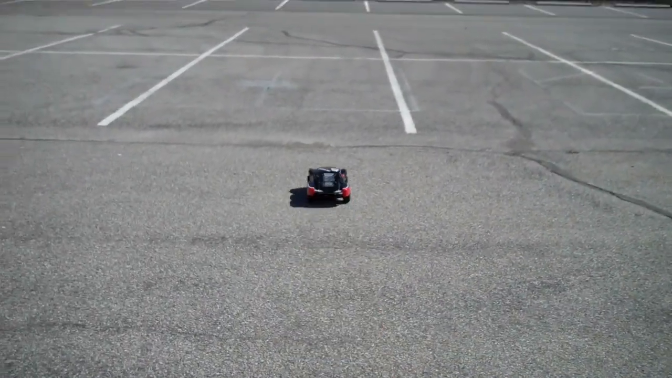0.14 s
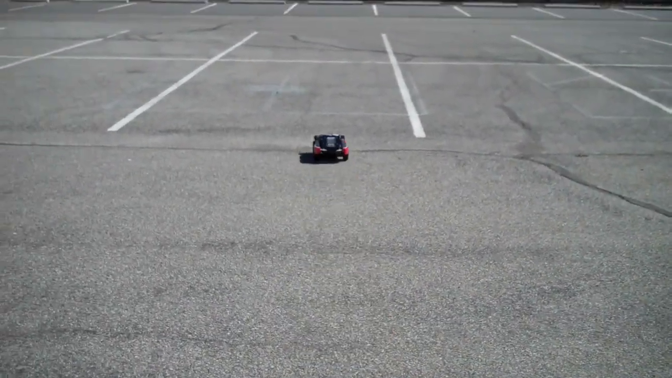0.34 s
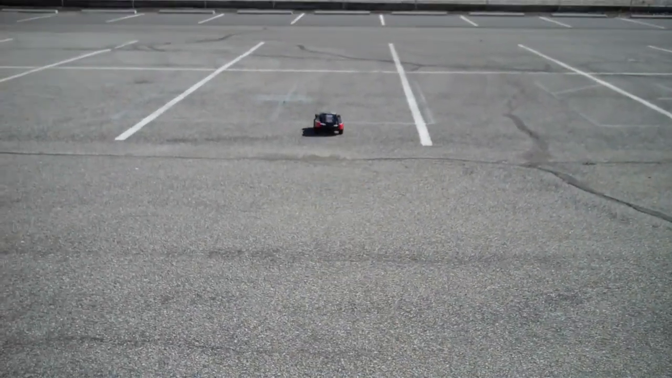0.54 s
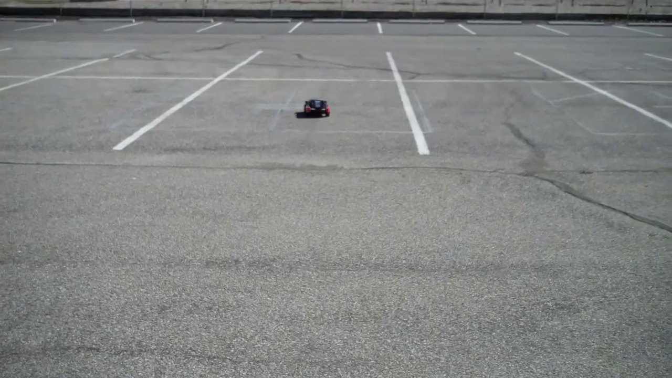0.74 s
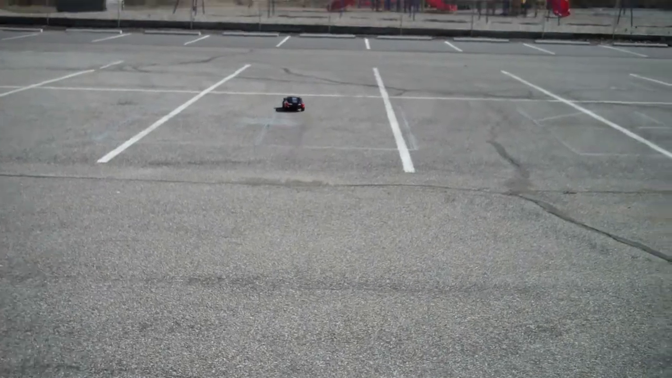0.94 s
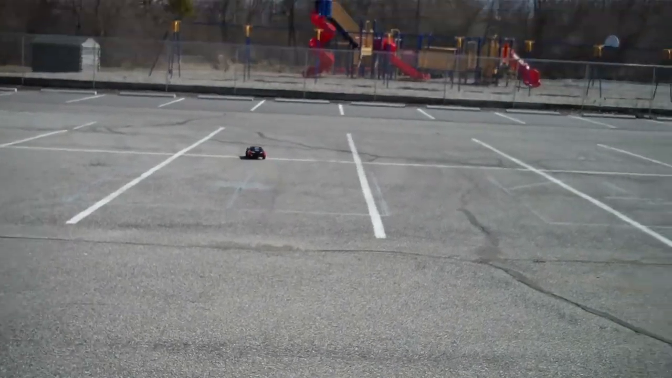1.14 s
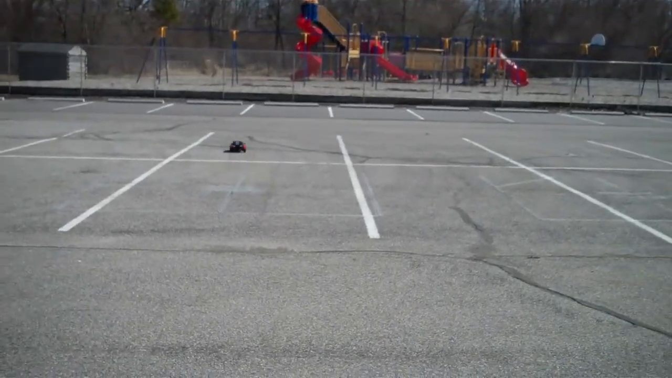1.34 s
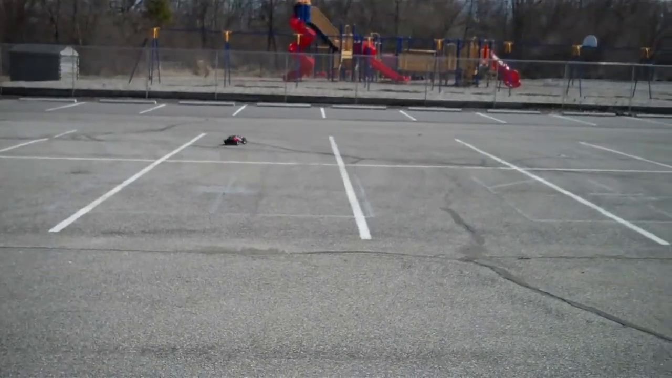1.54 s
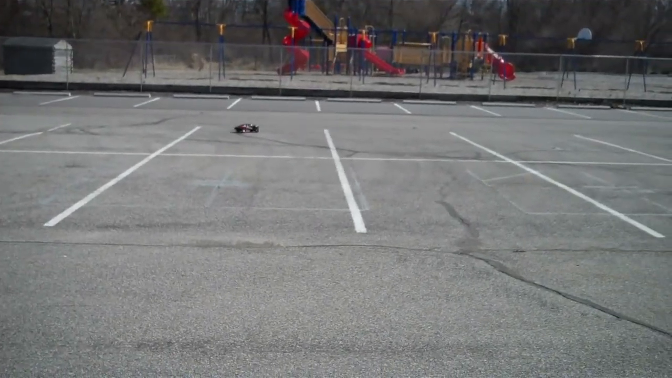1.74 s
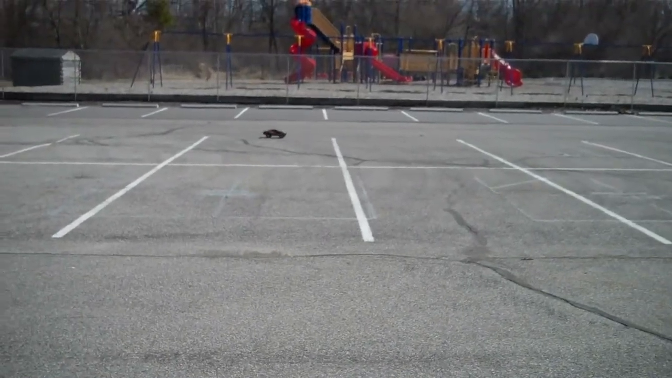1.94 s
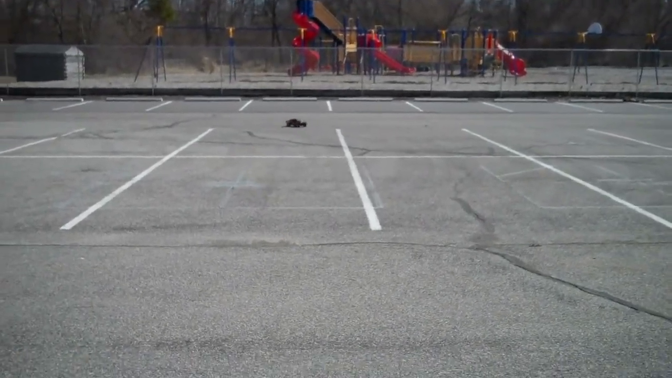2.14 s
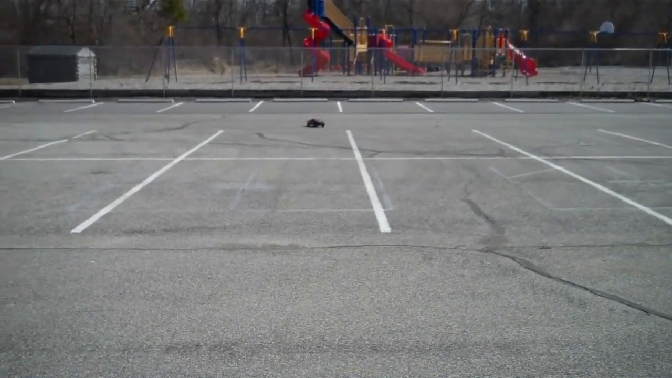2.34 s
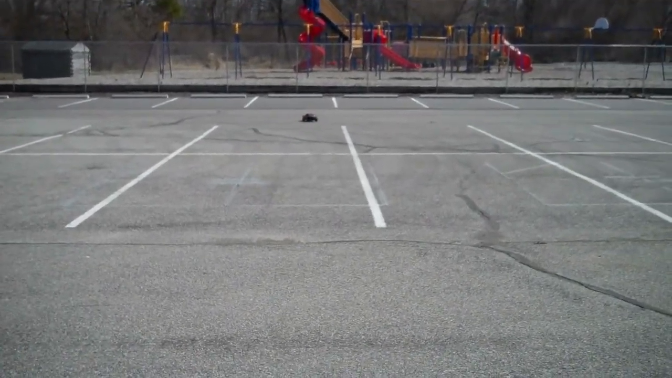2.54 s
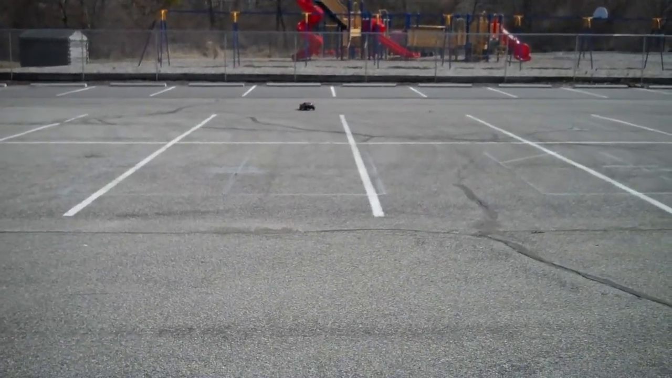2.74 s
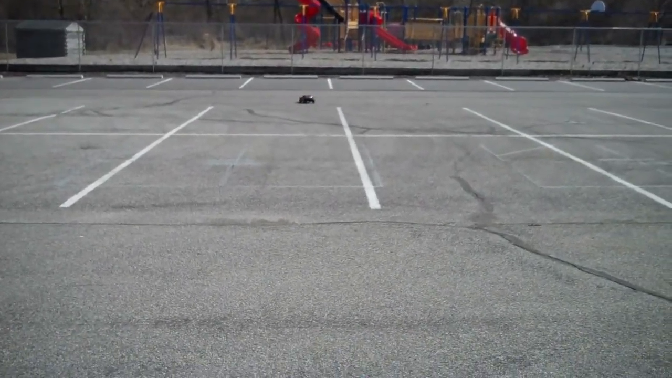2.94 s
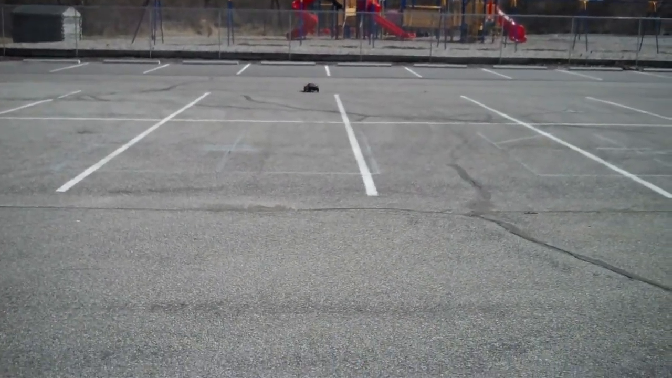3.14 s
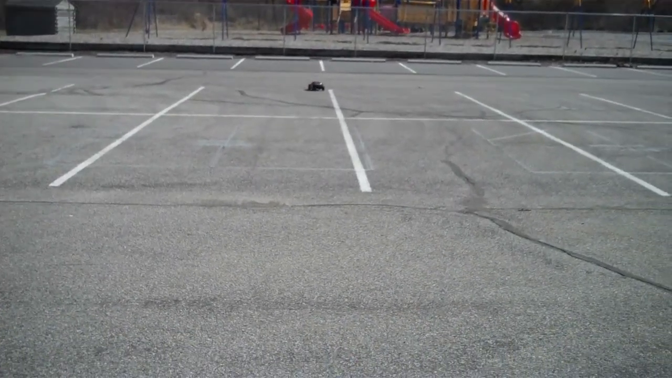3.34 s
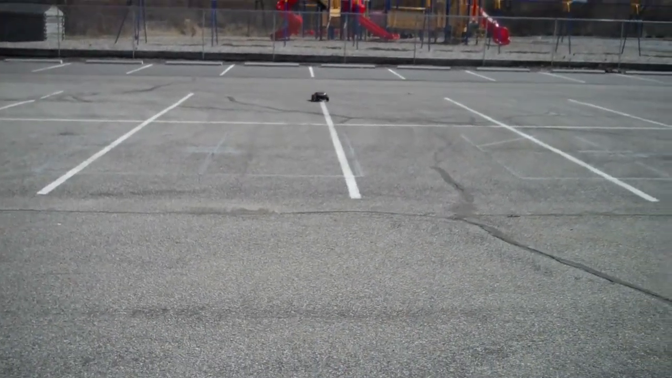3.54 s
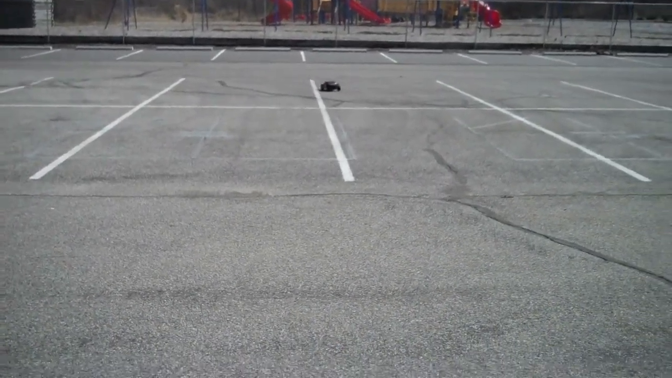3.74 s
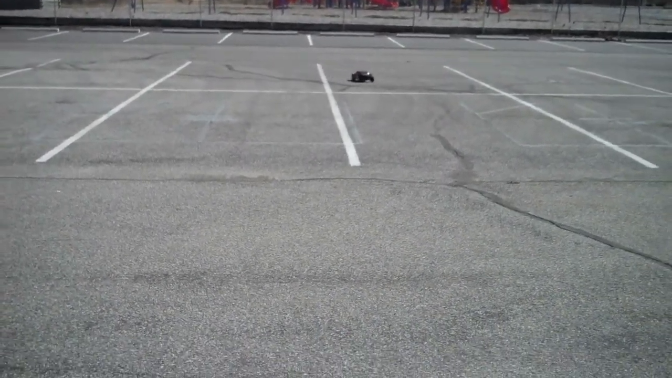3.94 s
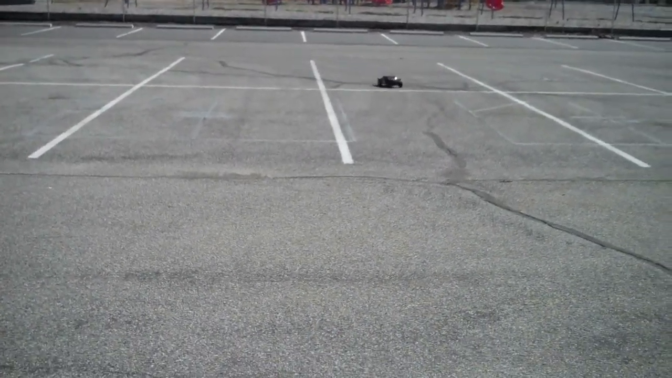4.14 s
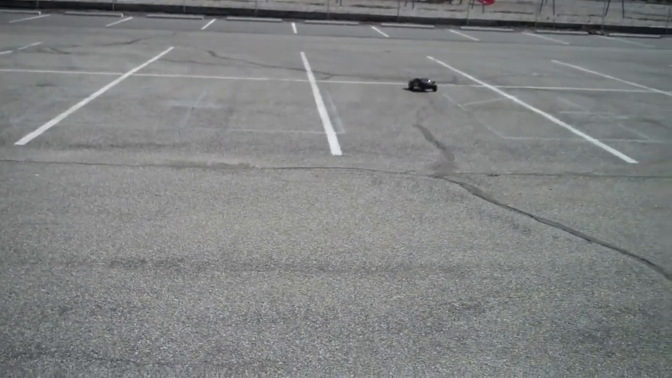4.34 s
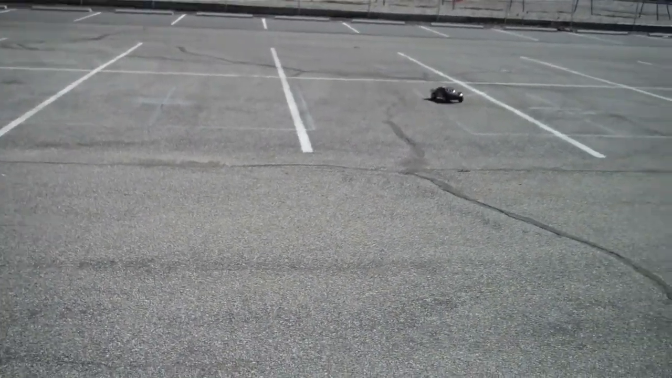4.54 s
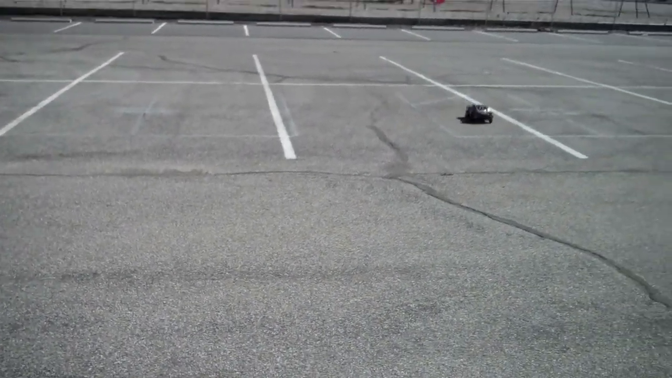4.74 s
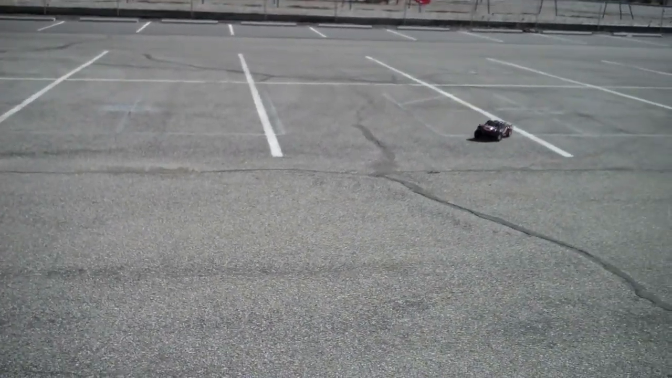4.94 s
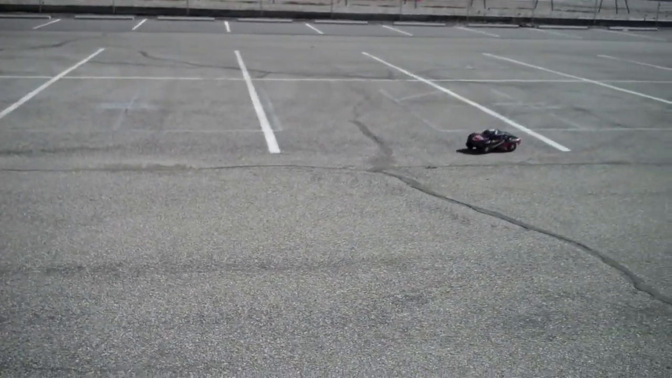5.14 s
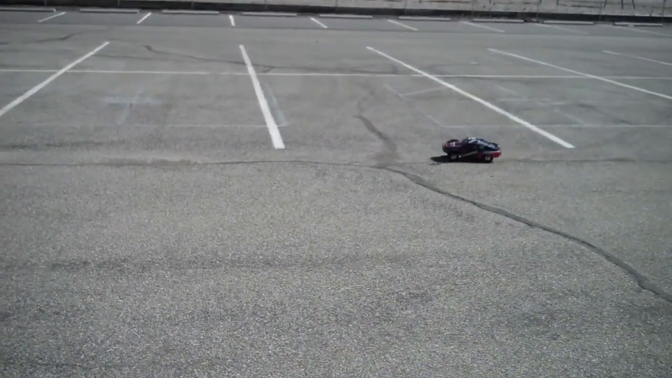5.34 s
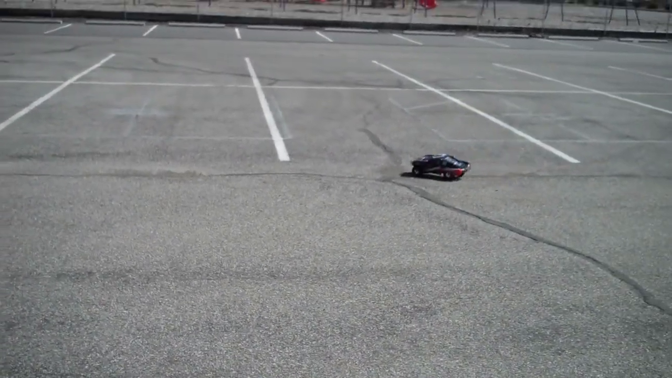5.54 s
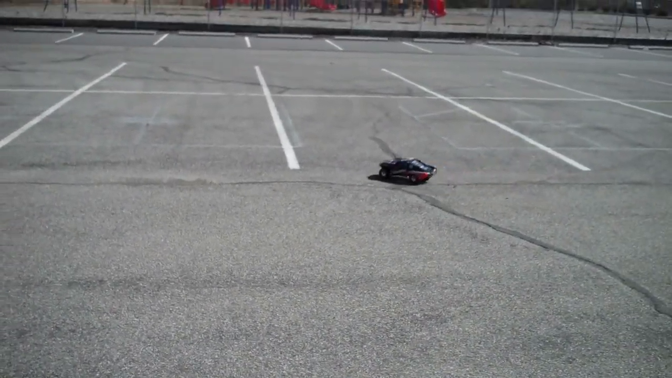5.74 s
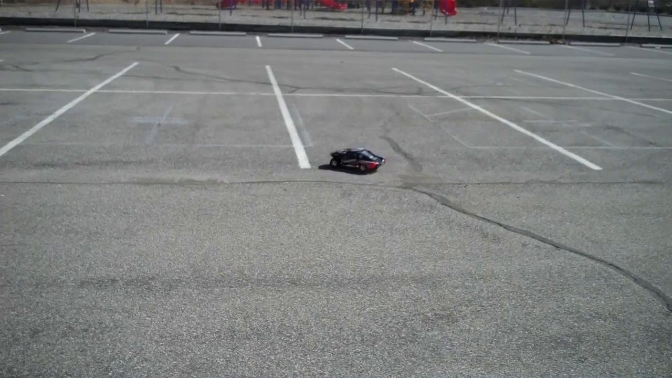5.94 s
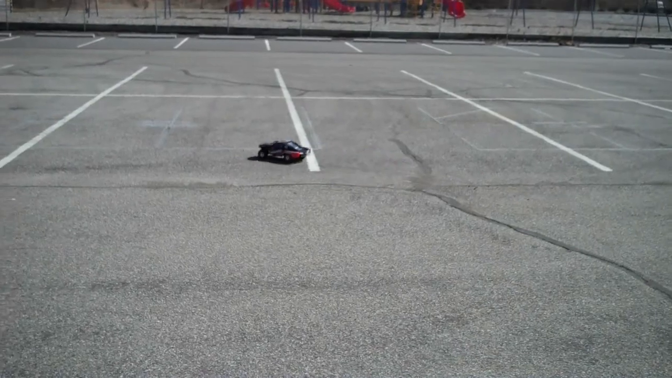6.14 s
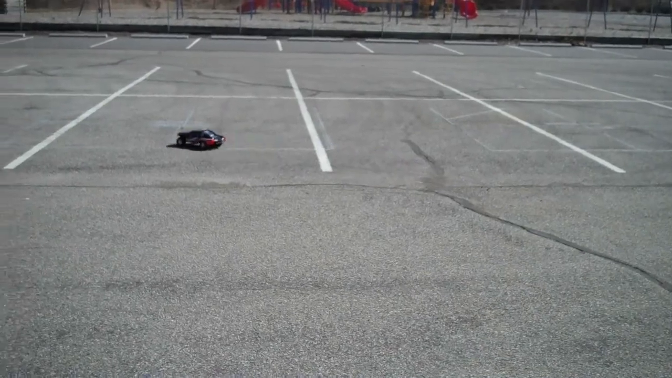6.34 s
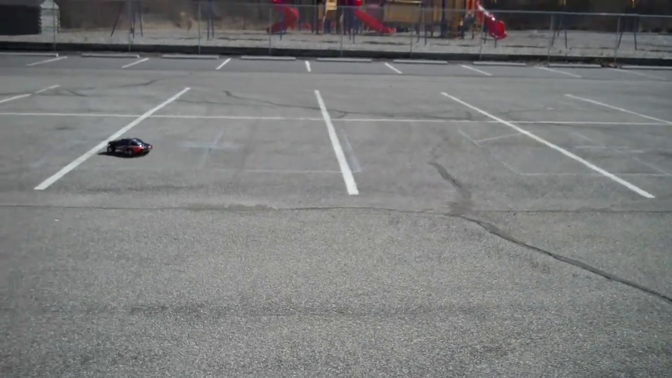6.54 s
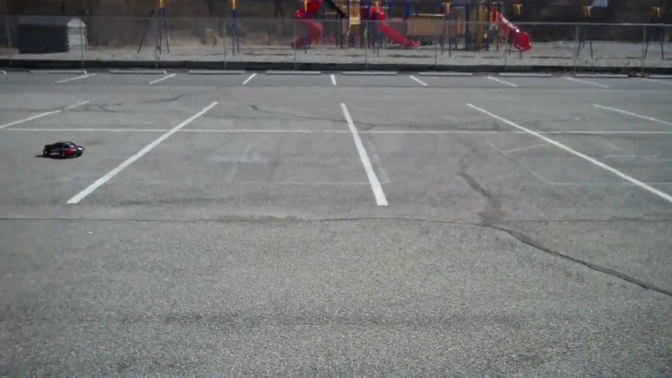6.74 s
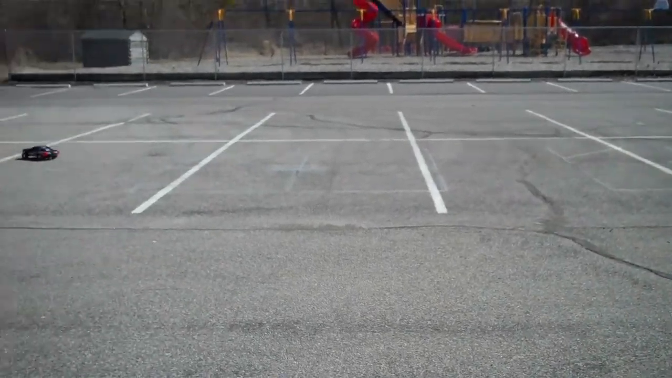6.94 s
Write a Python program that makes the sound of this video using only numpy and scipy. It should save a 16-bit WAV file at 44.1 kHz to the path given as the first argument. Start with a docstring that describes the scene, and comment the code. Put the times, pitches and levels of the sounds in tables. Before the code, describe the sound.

In an open paved lot, a remote-controlled truck whines upward in three pulls: away from the microphone, back toward it, then past at close range. Its gears rasp, its plastic body rattles and its tyres hum on the asphalt. Between pulls the rubber scrubs hoarsely in the turns, with a few sharp clicks and knocks. Light wind puffs and far traffic sit underneath.

```python
"""An open asphalt lot: a small electric radio-controlled truck races away, turns, comes back and passes.
Its gears whine upward in three pulls and rattle the plastic chassis. The tyre tread hums on the road,
and the rubber scrubs and howls in the turns. Grit snaps against the body and bumps knock the shell.
Light gusts touch the microphone, and traffic hums far off."""
import sys
import numpy as np
from scipy import signal
from scipy.fft import rfft, irfft, next_fast_len
from scipy.io import wavfile
from scipy.ndimage import uniform_filter1d

SR = 44100
rng = np.random.default_rng(int(sys.argv[2]) if len(sys.argv) > 2 else 0)


def dump_mix(stems):
    """Bounce the given channels to the path in sys.argv[1] as a 16-bit WAV at rate SR."""
    frames = np.atleast_2d(stems).T  # one column per channel
    limited = np.clip(frames, -1, 1)  # hard clip at full scale
    pcm = np.round(limited * 32767).astype(np.int16)
    wavfile.write(sys.argv[1], SR, pcm)


N = 307818
TIME = np.arange(N) / SR


def from_db(db):
    """Turn decibels into a number to multiply by."""
    return 10 ** (np.asarray(db) / 20)


def rms_one(x):
    """Scale a signal so its average power is 1."""
    return x / np.sqrt(np.mean(x ** 2) + 1e-20)


def in_time(rows):
    """Join rows that start with a time into one curve for each other column."""
    times, *columns = np.transpose(rows)
    return [np.interp(TIME, times, column) for column in columns]


def during(rows, fade_s=0.0049):
    """1 from the first row's time to the last, fading to 0 outside."""
    return np.clip(.5 + np.minimum(TIME - rows[0][0], rows[-1][0] - TIME) / fade_s, 0, 1)


def joined(runs):
    """Curves through several runs, plus one that is 1 during each run."""
    return in_time([row for run in runs for row in run]) + [sum(during(run) for run in runs)]


def swell(peak_s, half_s):
    """A bell-shaped rise and fall."""
    return np.exp(-((TIME - peak_s) / half_s) ** 2 / 2)


def at_hz(points, hz):
    """Look up a table's value at any pitch."""
    pitches, values = np.transpose(points)
    return np.interp(np.log(np.maximum(hz, 1)), np.log(pitches), values)


def drift(rate):
    """A smooth random wobble that changes about `rate` times a second."""
    size = next_fast_len(N)
    hz = np.arange(size // 2 + 1) * SR / size
    noise = rfft(rng.standard_normal(size))
    return rms_one(irfft(noise / (1 + (hz / rate) ** 2), size)[:N])


def turning(hz):
    """The growing angle (phase) of something that repeats hz times a second."""
    return 2 * np.pi * np.cumsum(hz) / SR


def rough_tone(phase, rough, width_hz):
    """A shaky tone: rough=0 is pure, rough=1 is a narrow band of noise."""
    shake = np.sqrt(rough / 2)
    strength = np.sqrt(1 - rough) + shake * drift(width_hz)
    return np.sqrt(2) * (strength * np.sin(phase) + shake * drift(width_hz) * np.cos(phase))


def panned(x, left_db):
    """Make stereo, with the left louder than the right by left_db."""
    left = 1 / (1 + from_db(-left_db))
    return 2 * np.array([x * left, x * (1 - left)])


# How far each pitch leans left: pitch_hz, left_db
LEFT_LEAN = [(60, 1.7), (300, 4.2), (4500, 1.9), (6300, 0.23), (7600, 21.5), (9000, 11.3), (14000, 17)]
# How alike left and right are: pitch_hz, likeness_0_to_1
STEREO_LIKENESS = [(40, 0), (140, 0.84), (350, 1), (700, 0.99), (4000, 0.76), (6000, 0.92), (7000, 0.19),
                   (9000, 0.065), (13000, 0)]
def coloured(spectrum, force=1.0):
    """Stereo noise shaped in pitch by `spectrum` and in time by `force`, at a standard level."""
    size = next_fast_len(N)
    hz = np.arange(size // 2 + 1) * SR / size
    mid, side = rfft(rng.standard_normal((2, N)) * force, size) * from_db(at_hz(spectrum, hz))
    alike = np.clip(at_hz(STEREO_LIKENESS, hz), -1, 1)
    pair = np.sqrt(1 + alike) * mid + np.sqrt(1 - alike) * side * [[1], [-1]]
    out = irfft(pair * panned(np.ones_like(hz), at_hz(LEFT_LEAN, hz)), size)[:, :N]
    return out / np.std(out.mean(axis=0))


# The wash of far traffic: pitch_hz, level_db
TRAFFIC_SPECTRUM = [(25, -22), (70, 0), (130, -1.5), (230, 0), (340, -4), (480, -3.5), (900, -4.5),
                    (1900, -5.5), (2700, -19), (7500, -15), (10000, -47), (14000, -40)]
# One far engine: time_s, pitch_hz, level_db
ENGINE_NOTE = [(0, 189.5, -56.5), (1.5, 197.4, -56.5), (3.2, 189.3, -56), (3.9, 127.2, -62),
               (5.5, 133.5, -63), (6.0, 151.6, -56), (6.98, 150, -52.5)]
def traffic():
    """Distant traffic hums, with one engine changing its note."""
    hz, level_db = in_time(ENGINE_NOTE)
    hum = from_db(level_db) * rough_tone(turning(hz), rough=0.52, width_hz=3.6)
    return from_db(-46.5) * coloured(TRAFFIC_SPECTRUM) + panned(hum, 1.8)


# Puffs of wind: peak_s, level_db, half_length_s
WIND_PUFFS = [(2.206, -42, 0.016), (2.528, -43, 0.019), (2.809, -46, 0.029), (2.96, -45, 0.047),
              (3.136, -39.5, 0.011), (4.152, -35.5, 0.021), (4.316, -40, 0.026), (4.416, -40.5, 0.089),
              (4.666, -34, 0.017), (4.755, -39, 0.043), (4.94, -38.5, 0.03), (5.414, -46, 0.067),
              (6.74, -28, 0.012)]
# Their rumble: pitch_hz, level_db
WIND_SPECTRUM = [(25, -15), (60, -2), (130, 4.5), (250, -2), (400, -9.5), (800, -29), (2000, -48)]
def wind():
    """Swirls of air buffet each side of the microphone separately."""
    strength = sum(from_db(db) * swell(peak_s, half_s) for peak_s, db, half_s in WIND_PUFFS)
    return strength * np.array([coloured(WIND_SPECTRUM)[0], coloured(WIND_SPECTRUM)[0]])


# Single swirls of air: peak_s, level_db, pitch_hz
WIND_THUMPS = [(2.518, -31, 140), (2.564, -34, 240), (2.696, -22.5, 258)]
def wind_thumps():
    """A lone swirl gives the microphone one dull push."""
    out = np.zeros(N)
    for peak_s, db, hz in WIND_THUMPS:
        spread = (np.pi * hz * (TIME - peak_s)) ** 2
        out += from_db(db) * (1 - 2 * spread) * np.exp(-spread)
    return out


# The truck's path: time_s, distance_m
TRUCK_DISTANCE = [(0, 2.54), (.45, 4.7), (1.18, 9.2), (2.1, 9.05), (3.3, 15.4), (4.0, 9.6), (5.55, 4.2),
                  (6.4, 5.5), (6.98, 8.06)]
def distance():
    """Metres from the truck to the microphone."""
    return np.maximum(in_time(TRUCK_DISTANCE)[0], 1)


# Away, a sliding turn, back, a second turn, past: time_s, speed_m_per_s
TRUCK_SPEED = [(0, 3.54), (.8, 4.62), (1.7, 5.04), (2.1, 0.82), (2.35, 2.34), (2.62, 0.33), (2.88, 1.3),
               (3.02, 2.04), (3.46, 3.12), (4.0, 4.1), (4.45, 3.7), (5.2, 2.25), (5.46, 1.73), (5.55, 0.87),
               (5.65, 1.36), (5.78, 3.75), (6.2, 3.2), (6.5, 4.57), (6.98, 3.78)]
def travel_db():
    """The truck is louder when it is faster or nearer."""
    speed = np.maximum(in_time(TRUCK_SPEED)[0], .1)
    return 20 * np.log10(speed / distance())


# Landings after bumps: start_s, level_db, decay_s
LANDINGS = [(0.526, -20.5, 0.013), (0.976, -32.5, 0.011), (2.747, -37, .005), (2.785, -45, .006),
            (4.812, -36, 0.023), (5.336, -33, 0.018), (5.507, -29, 0.01)]
# The hollow body shell: pitch_hz, level_db
SHELL_SPECTRUM = [(200, -15), (480, -13), (680, -0.5), (950, -0.5), (1350, 2), (1720, 4), (2100, -2),
                  (3000, -9), (8000, -56)]
def landings():
    """The suspension bottoms out and the hollow shell gives a short knock."""
    force = np.zeros(N)
    for start_s, db, decay_s in LANDINGS:
        age = np.maximum(TIME - start_s, 0) / decay_s
        force += from_db(db) * 2 * age * np.exp(1 - 2 * age)
    return force * coloured(SHELL_SPECTRUM)


# Grit and chassis snaps: start_s, level_db, left_db, chatter_db (against the hit)
SNAP_HITS = [(.5821, -11, 12, -17), (.6135, -11, 12, -16), (0.9768, -4, 15, -17.5), (1.5574, -19, 8, -16),
             (1.727, -17, 4, -14), (1.771, -10, 3, -22), (1.9767, -17.5, 12, -14), (2.053, 5.5, 18, -34),
             (2.0612, -7, 16, -22), (2.069, -4.5, 11, -22), (2.078, -11, 18, -21), (2.704, -33, 8, -12),
             (2.749, -27, 4, -15.5), (2.786, -23, 7, -14), (4.4675, -5, 17, -18), (4.6319, -19, 10, -15),
             (5.016, -17, 10, -12), (5.1235, -11, 6, -23), (5.1328, 3.5, 23, -30), (5.139, -8, 10, -20),
             (5.177, -16, 12, -24)]
# The notes they ring: pitch_hz, level_db, ring_s (time to fall 60 dB)
SNAP_NOTES = [(2730, -12, 0.0047), (4070, -8, 0.0098), (4540, -8, 0.0088), (5240, -3, 0.005),
              (6500, -11.5, 0.011), (6986, -4.5, 0.0091), (7460, 1.5, 0.0044), (7920, -25, 0.14),
              (8250, -39, 0.15), (10700, -37, 0.0029)]
def snaps(chatter_s=.0043):
    """Each hard hit rings the plastic shell and chatters briefly."""
    force, out = np.zeros((2, N)), np.zeros((2, N))
    age = TIME[:SR // 20]
    for start_s, db, left_db, chatter_db in SNAP_HITS:
        hit = from_db(chatter_db) * rng.standard_normal(len(age)) * np.exp(-age / chatter_s)
        hit[0] = 1
        at = round(start_s * SR)
        force[:, at:at + len(age)] += panned(from_db(db - 7.5) * hit, left_db)
    for k, (hz, db, ring_s) in enumerate(SNAP_NOTES):
        fade, step = from_db(-60 / (ring_s * SR)), 2 * np.pi * hz / SR
        ring = signal.lfilter([0, np.sin(step)], [1, -2 * fade * np.cos(step), fade ** 2], force + 1e-18)
        out += (-1) ** k * from_db(db) * ring
    return out


def slide(peak_s, rise_s, fall_s):
    """A skid builds from 0 to 1 and dies away."""
    return np.exp(-((TIME - peak_s) / np.where(TIME < peak_s, rise_s, fall_s)) ** 2)


# Skids in launches and turns: peak_s, level_db, rise_s, fall_s, howl_pitch_hz
TYRE_SKIDS = [(0, -29.5, .05, 0.079, 701.2), (0.539, -37, 0.02, 0.054, 800.4), (1.77, -30, 0.15, 0.26, 880),
              (2.179, -34.5, 0.15, 0.19, 820.8), (3.02, -42, 0.11, 0.25, 760.6),
              (5.26, -27.5, 0.26, .2, 939.5), (5.88, -30, 0.18, 0.19, 701.6)]
# Rubber rubbing on asphalt: pitch_hz, level_db
SCRUB_SPECTRUM = [(100, -48), (300, -11.5), (480, -13.5), (630, 0), (950, 1.5), (1200, -1), (1450, -1),
                  (1630, -2.5), (1900, -2), (2300, -11), (3200, -17.5), (5000, -11.5), (10000, -43)]
def tyre_scrub(roll_db=-35, crisp_within_m=6.7):
    """Rubber catches and slips on coarse asphalt, swelling in each skid and duller far away."""
    power = from_db(roll_db + 0.96 * travel_db()) ** 2
    for peak_s, db, rise_s, fall_s, _ in TYRE_SKIDS:
        power += from_db(db - 1) ** 2 * slide(peak_s, rise_s, fall_s)
    grip = from_db(.7 * drift(41) + 1.9 * drift(190))
    scrub = np.sqrt(power) * coloured(SCRUB_SPECTRUM, force=grip)
    dull = signal.sosfiltfilt(signal.butter(2, 1300, fs=SR, output="sos"), scrub)
    return dull + np.minimum(crisp_within_m / distance(), 1) * (scrub - dull)


def tyre_howl(gain_db=-6.5, pitch_sag=.25):
    """Rubber sticks and slips in a hoarse note that rises with each skid and sinks as it grips again."""
    powers, pitches = [], []
    for peak_s, db, rise_s, fall_s, hz in TYRE_SKIDS:
        sliding = slide(peak_s, rise_s, fall_s)
        powers.append(from_db(db) ** 2 * sliding + 1e-12)
        pitches.append(hz * (1 - pitch_sag * (1 - sliding)))
    phase = turning(np.average(pitches, axis=0, weights=powers))
    howl = rough_tone(phase, rough=1, width_hz=125)
    return panned(from_db(gain_db) * np.sqrt(sum(powers)) * howl, 3.3)


# Tread blocks meeting the road, one list per run: time_s, blocks_per_s
TREAD_RUNS = [
    [(0, 680), (.12, 735), (.22, 762), (.33, 835), (.43, 860), (.52, 975), (.9, 1020)],
    [(3.4, 620), (3.55, 690), (3.74, 752), (4.0, 828), (4.35, 895), (4.6, 915)],
    [(5.93, 690), (5.96, 740), (6.0, 725), (6.05, 655)],
    [(6.16, 662), (6.26, 676), (6.29, 728), (6.36, 748), (6.42, 803), (6.52, 855), (6.68, 893), (6.82, 938)],
]
# Each run at the tyres' own note, 1 m away: level_db
TREAD_LEVELS = [-20, -17.5, -12, -10]
def tread_hum(tyre_hz=748):
    """Tread blocks slap the road so fast that they hum, loudest at the hollow tyres' own note."""
    hz, _ = joined(TREAD_RUNS)
    strength = sum(from_db(db) * during(run, fade_s=0.09) for run, db in zip(TREAD_RUNS, TREAD_LEVELS))
    width_hz = np.where(hz < tyre_hz, 30, 50)
    resonance = 1 / np.hypot(1, (hz - tyre_hz) / width_hz)
    smooth_hz = uniform_filter1d(hz, size=SR // 16)   # the truck's weight smooths its speed
    phase = turning(smooth_hz * (1 + 0.0047 * drift(17.6)))
    hum = rough_tone(phase, rough=0.4, width_hz=36)
    hum += from_db(-21) * rough_tone(2 * phase, rough=.8, width_hz=17)
    return panned(strength * resonance * hum / distance(), 3.4)


# Moments of part throttle: peak_s, pitch_hz, level_db, half_length_s
THROTTLE_BLIPS = [(0.534, 3690, -21, .008), (0.597, 3670, -19.5, 0.009), (3.075, 4070, -34, 0.0025),
                  (5.672, 3790, -30, 0.0055), (5.713, 3800, -33, 0.0043), (5.754, 3783, -31, 0.0044),
                  (5.865, 3770, -33.5, 0.049), (6.044, 3820, -33.5, .02), (6.12, 3800, -31, 0.013),
                  (6.19, 3780, -37, .04), (6.28, 3715, -33, 0.0077)]
def speed_controller(stutter_per_s=70, stutter_db=4):
    """Chopped current makes the motor's coils sing and stutter at a nearly steady pitch."""
    hz = in_time(THROTTLE_BLIPS)[0]
    strength = sum(from_db(db) * swell(peak_s, half_s) for peak_s, _, db, half_s in THROTTLE_BLIPS)
    stutter = rms_one(from_db(stutter_db * np.tanh(drift(stutter_per_s))))
    return panned(strength * stutter * rough_tone(turning(hz), rough=0.91, width_hz=55), 5.4)


# Strain on the gears: time_s, load_0_to_1
GEAR_LOAD = [(0, 0.37), (.4, 0.7), (.9, 0.49), (1.15, 0.29), (1.5, 0.17), (1.8, 0.42), (2.1, 0.091),
             (2.9, 0.052), (3.4, 0.45), (3.8, 0.62), (4.45, 0.62), (4.6, 0.11), (4.95, 0.34), (5.2, 0.089),
             (5.9, 0.21), (6.3, 0.2), (6.6, 0.32), (6.98, 0.42)]
def gear_load():
    """How hard the gears are working at each moment."""
    return np.clip(in_time(GEAR_LOAD)[0], 0, 1)


# Rough patches of road: start_s, boost_db, decay_s
ROAD_JOLTS = [(0.609, 4.5, 0.058), (1.332, 1, 0.2), (1.755, 5.5, 0.031), (1.876, 7.5, 0.0054),
              (2.235, 6, 0.062), (4.45, 1.5, 0.025), (5.121, 11.5, 0.012), (5.36, 3, 0.19),
              (6.9, 4.5, 0.17)]
def drive_db(base_db=-25, full_load_db=9, attack_s=0.0035):
    """Gear noise follows speed, distance and load, with a dying shudder after each jolt."""
    shudder = np.zeros(N)
    for start_s, db, decay_s in ROAD_JOLTS:
        rise = np.interp(TIME, [start_s, start_s + attack_s], [0, 1])
        fall = np.exp(-np.maximum(TIME - start_s - attack_s, 0) / decay_s)
        shudder += (from_db(db) - 1) * rise * fall
    return base_db + travel_db() + full_load_db * gear_load() + 20 * np.log10(1 + shudder)


# Notes the gearbox case rings at: pitch_hz, width_hz, level_db
GEARBOX_NOTES = [(1370, 340, -16), (1857, 160, -10), (2480, 110, -22), (2630, 120, -9), (2890, 134, -4),
                 (3450, 330, -3.5), (3950, 71, -3.5), (5190, 89, -7.5), (5440, 390, 0.5), (6950, 350, -7),
                 (7250, 290, -2.5), (8140, 490, -6), (11100, 1300, -24)]
def gearbox_spectrum():
    """How strongly the case rings at each pitch, as rows of pitch_hz, level_db."""
    hz = np.geomspace(20, SR / 2, 600)
    gain = sum(from_db(db) / (1 + ((hz - centre) / width) ** 2) for centre, width, db in GEARBOX_NOTES)
    return np.transpose([hz, 20 * np.log10(gain)])


def gear_rasp():
    """Teeth meet unevenly and ring the gearbox case."""
    return coloured(gearbox_spectrum(), force=from_db(1.7 * drift(29) + drift(470)))


# The plastic chassis: pitch_hz, level_db
CHASSIS_SPECTRUM = [(50, -29), (200, -17.5), (330, -3.5), (430, -11), (1200, -11), (2000, -0.5), (2800, 2),
                    (3150, -1), (3700, 0.5), (4400, -1.5), (5300, -4), (6200, 0.5), (7300, 2), (8000, -7),
                    (9200, -13), (11500, -21), (14500, -34)]
# How the rattle's treble rises and falls: time_s, level_db
RATTLE_TREBLE = [(0, -3.5), (1.36, -3.5), (1.6, -6), (2.15, -0.5), (2.45, -10), (2.85, 4), (3.2, -8.5),
                 (3.7, -7.5), (3.9, -17), (4.9, -2.5), (5.7, -7), (6.25, -3), (6.8, -11), (6.98, -3.5)]
def chassis_rattle(knocks_per_s=130, knock_db=7.5, knock_s=0.00011):
    """Loose gears and grit shake the plastic in tiny knocks; under load this turns into gearbox rasp."""
    load = gear_load()
    clicks = (rng.random(N) < knocks_per_s / SR) * rng.random(N) ** 2
    knocks = signal.lfilter([1], [1, -np.exp(-1 / (knock_s * SR))], clicks + 1e-18)
    force = from_db(2.16 * drift(40) + 2 * drift(320)) + from_db(knock_db) * knocks
    rattle = np.sqrt(1 - load) * coloured(CHASSIS_SPECTRUM, force) + np.sqrt(load) * gear_rasp()
    treble = signal.sosfiltfilt(signal.butter(2, 5800, "high", fs=SR, output="sos"), rattle)
    treble_gain = from_db(in_time(RATTLE_TREBLE)[0] + 4)
    return from_db(drive_db() - 2.5) * (rattle + (treble_gain - 1) * treble)


# Axle gears, one list each time they stand out: time_s, pitch_hz, level_db
AXLE_RUNS = [
    [(.28, 2457, -32), (.43, 2570, -29.5), (.5, 2810, -36), (.64, 2845, -36.5), (.85, 2902, -34.5),
     (1.05, 3090, -40)],
    [(1.54, 2680, -37), (1.7, 2560, -44), (1.77, 2940, -30), (1.85, 2940, -48)],
    [(4.03, 2538, -47), (4.15, 2578, -39), (4.3, 2726, -44.5), (4.46, 2795, -33), (4.55, 2670, -73)],
    [(4.82, 2980, -46), (4.92, 2743, -31.5), (5.06, 2610, -42), (5.14, 2580, -41)],
]
def axle_whirr():
    """The axle gears whirr: clear under load, grainy when the teeth are slack."""
    hz, level_db, running = joined(AXLE_RUNS)
    load = gear_load()
    phase = turning(hz * (1 + 0.00504 * drift(21.1)))
    clear = load * rough_tone(phase, rough=0.14, width_hz=16)
    grainy = np.sqrt(1 - load ** 2) * rough_tone(phase, rough=0.95, width_hz=140)
    return panned(running * from_db(level_db) * (clear + grainy), 3.9)


# Lines that follow the whine at fixed ratios: times_whine_pitch, relative_level_db
WHINE_COMPANIONS = [(.482, -6.5), (.56, -16), (1.28, -9.5), (1.505, -21), (1.72, -14)]
def companion_lines(whine_hz, whine_phase):
    """Each line sings under load, and swells as it glides through a note of the gearbox case."""
    case, level_db = gearbox_spectrum(), drive_db()
    tones = np.zeros(N)
    for multiple, db in WHINE_COMPANIONS:
        strength = from_db(level_db + db + at_hz(case, multiple * whine_hz))
        tones += strength * rough_tone(multiple * whine_phase, rough=0.95, width_hz=60 * multiple)
    return np.sqrt(gear_load()) * tones


# The whine, one list per pull (the last pull takes two): time_s, pitch_hz, level_db, octave_level_db
WHINE_PULLS = [
    [(0, 2910, -21, -30), (.04, 2920, -25, -51), (.07, 3297, -17, -49), (.095, 3000, -22, -34),
     (.2, 3226, -23, -38), (.3, 3410, -18.5, -31.5), (.43, 3540, -15, -30), (.46, 3620, -28, -32),
     (.52, 4070, -28, -27.5), (.535, 3790, -36, -41), (.555, 4160, -26, -29.5), (.6, 3705, -31, -36),
     (.66, 3960, -36, -32), (.8, 4075, -29, -38), (.96, 4270, -27, -45), (1.08, 4220, -40, -52)],
    [(2.86, 1838, -41, -69), (2.925, 1905, -40, -68), (2.948, 1668, -36, -56), (2.973, 1730, -28, -52),
     (2.99, 1590, -34, -54), (3.003, 1947, -27.5, -49), (3.03, 2170, -39, -44), (3.08, 2208, -39, -56),
     (3.12, 2489, -39, -53), (3.16, 2331, -41, -53), (3.21, 2174, -41, -54), (3.25, 2333, -39, -52),
     (3.35, 2444, -40, -59), (3.62, 2970, -35, -50), (3.8, 3274, -31, -53), (4.02, 3385, -26, -44),
     (4.15, 3563, -39, -40), (4.5, 3710, -35, -44)],
    [(5.666, 2520, -27, -55), (5.685, 2660, -25.5, -55), (5.702, 2920, -31, -55)],
    [(5.73, 1705, -48, -60), (5.77, 2070, -31, -39), (5.82, 2474, -29, -43), (5.865, 2590, -24.5, -46),
     (5.905, 2483, -23, -46), (5.925, 2770, -26, -54), (5.943, 2570, -25, -54), (5.96, 3030, -29, -50),
     (6.03, 2750, -36, -50), (6.1, 2780, -29, -56), (6.14, 2608, -26, -63), (6.17, 2800, -29, -60),
     (6.22, 2820, -26, -58), (6.245, 2880, -31, -58), (6.28, 3050, -24, -53), (6.32, 3006, -26, -55),
     (6.41, 3280, -24.5, -46), (6.49, 3450, -26, -37.5), (6.69, 3660, -23, -39.5), (6.78, 3860, -46, -38),
     (6.98, 4090, -28, -54)],
]
# An off-centre gear meets early, then late, adding side tones: time_s, sway_radians
GEAR_SWAY = [(0, .25), (.4, .45), (1, .8), (3.55, .4), (3.85, 1.05), (4.5, 1.0), (5.7, .25), (6.35, .4),
             (6.55, 1.05)]
def gear_whine(teeth=20, air_db_per_m=2):
    """The motor gear's teeth meet thousands of times a second, making a whine with two overtones."""
    hz, level_db, octave_db, running = joined(WHINE_PULLS)
    slip = 1 - gear_load()
    skipping = slip ** 2 * np.tanh(drift(21.84))   # tyres catch and let go, so the whine stutters
    phase = turning(hz * (1 + .003 * drift(25) + .012 * skipping))
    level_db = level_db - 3 * skipping
    swayed = phase + in_time(GEAR_SWAY)[0] * np.sin(phase / teeth + drift(27))
    whine = from_db(level_db - 5.5 - 2.5 * slip) * rough_tone(swayed, rough=0.36, width_hz=4)
    # play between the teeth smears the tone
    whine += from_db(level_db - 9.5 + 2.2 * slip) * rough_tone(swayed, rough=1, width_hz=290)
    octave = from_db(octave_db + 2.5) * rough_tone(2 * phase, rough=0.76, width_hz=150)
    octave += from_db(octave_db - 0.5) * rough_tone(2 * swayed, rough=0.92, width_hz=520)
    # the highest overtone fades first with distance
    top_db = level_db + at_hz(CHASSIS_SPECTRUM, 3 * hz) - air_db_per_m * distance()
    top = from_db(top_db) * rough_tone(3 * swayed, rough=0.73, width_hz=380)
    overtones = panned(octave, at_hz(LEFT_LEAN, 2 * hz)) + panned(top, 15)
    return running * (panned(whine + companion_lines(hz, phase), 3.6) + overtones)


def scene(echo_s=.2, echo_db=-16.5):
    """The truck and one faint echo from the far edge of the lot, over wind and traffic."""
    truck = (gear_whine() + axle_whirr() + tread_hum() + chassis_rattle() + tyre_scrub() + tyre_howl()
             + landings() + speed_controller() + snaps())
    delayed = np.pad(truck, ((0, 0), (round(echo_s * SR), 0)))[:, :N]
    echo = signal.sosfilt(signal.butter(1, 3000, fs=SR, output="sos"), delayed)
    return truck + from_db(echo_db) * echo + wind() + wind_thumps() + traffic()


def record(dry):
    """The loudest peaks are clipped and the highest treble is cut."""
    cutoff_hz = 14400
    return signal.sosfilt(signal.ellip(10, .2, 70, cutoff_hz, fs=SR, output="sos"), np.clip(dry, -1, 1))


dry = scene()
out = record(dry)
dump_mix(out)
```